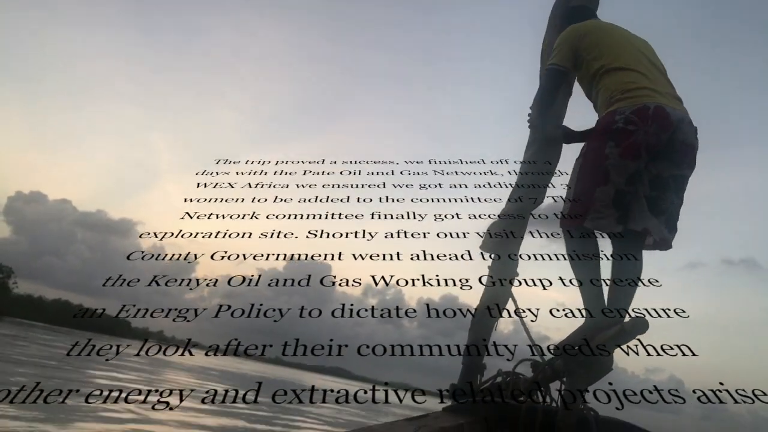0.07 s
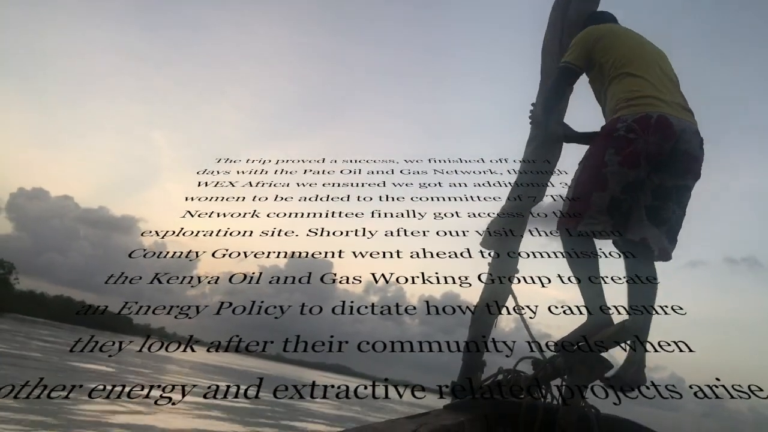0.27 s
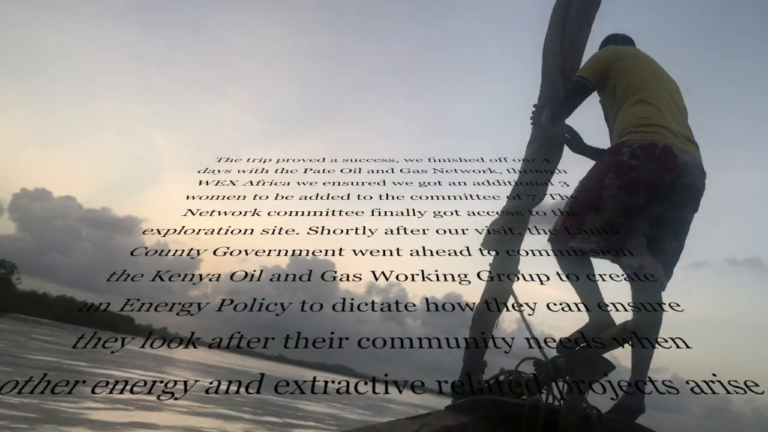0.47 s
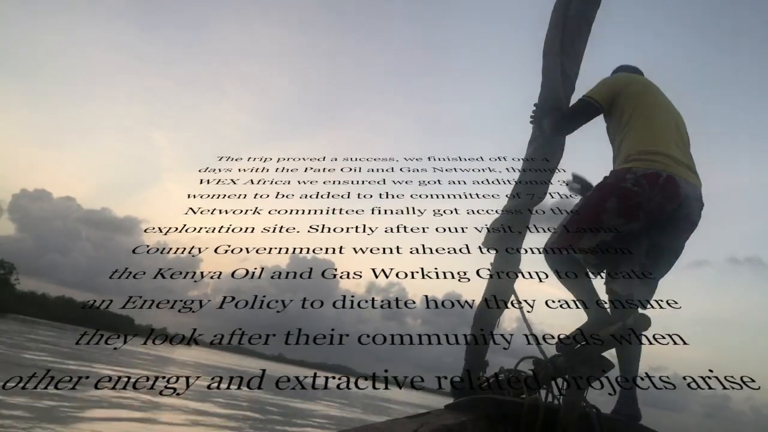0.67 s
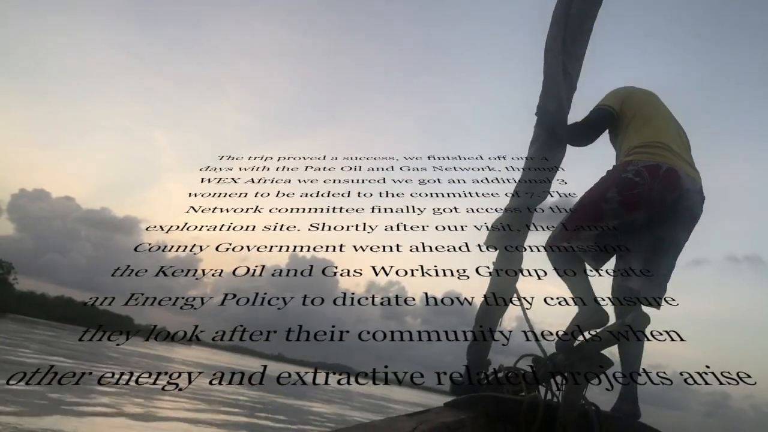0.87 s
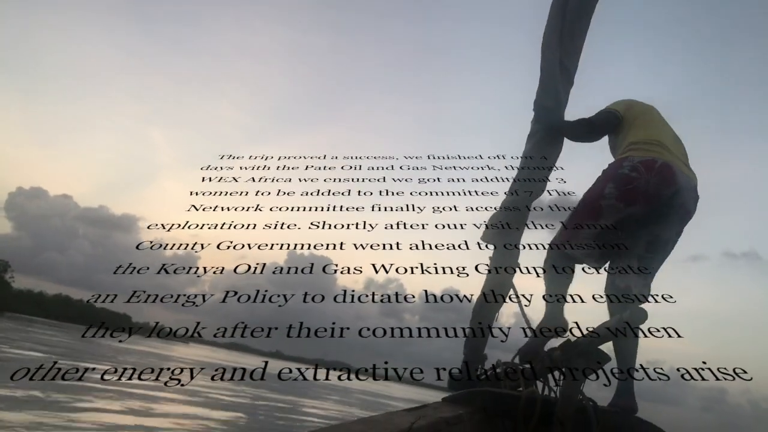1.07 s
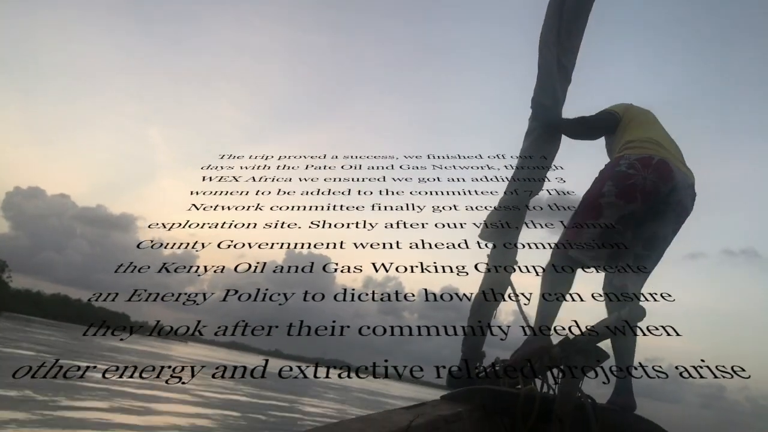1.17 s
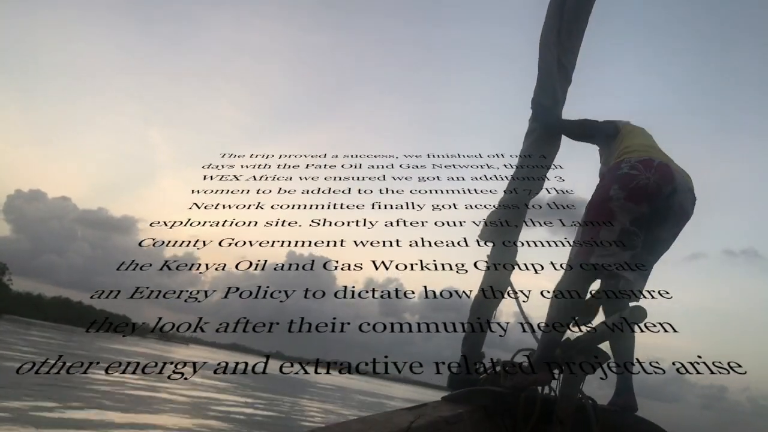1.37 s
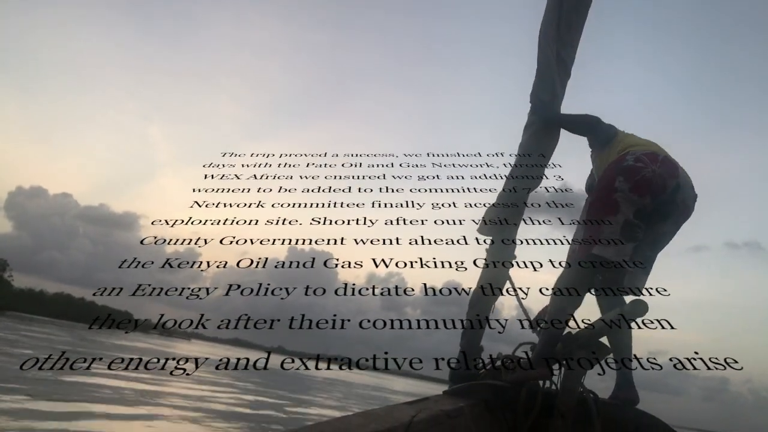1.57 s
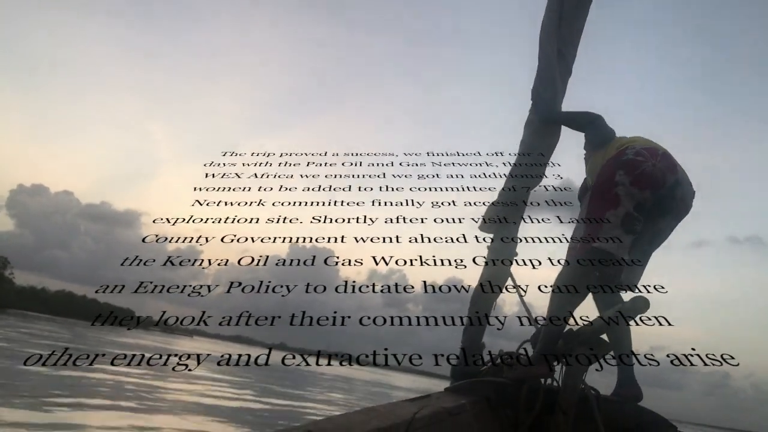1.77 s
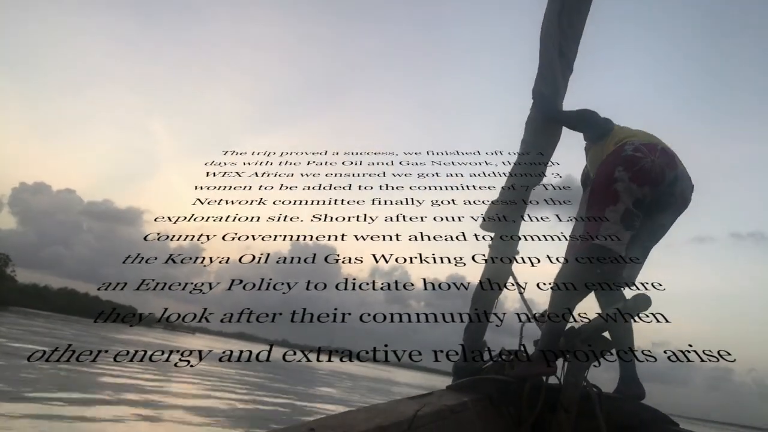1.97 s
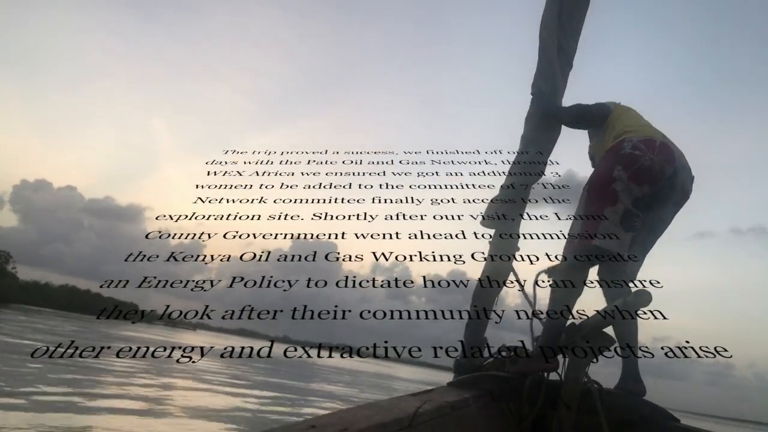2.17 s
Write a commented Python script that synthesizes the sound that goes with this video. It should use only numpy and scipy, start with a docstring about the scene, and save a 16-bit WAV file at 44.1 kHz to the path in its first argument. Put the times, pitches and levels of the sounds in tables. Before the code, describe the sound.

Feet thud on the planks of a wooden sailing boat. A short dry scuff opens, with a soft low bump near 0.24 s. Knocks and a dull double thud come at 0.41-0.52, a sharp hard tick at 0.59, then the loudest woody thump at 0.62, scuffing and bumping until 0.77. Faint scrapes fade by 1.05; soft thuds follow at 1.16 and 1.92 over steady low hull rumble, light wash and hiss.

```python
"""Feet land on the planks at the mast of a wooden sailing boat: smooth pushes ring the hull's modes as
thuds and knocks. Soles and rope scuff the wood in bunched short grains, and taps ring a small hard fitting.
Under it the hull rumbles in the water, with wash along the side and a smooth hiss, all shaped noise.
One microphone on board hears it all, short of the deepest bass and of two narrow treble bands."""
import sys
import numpy as np
from scipy import signal
from scipy.fft import rfft, irfft
from scipy.io import wavfile
from scipy.ndimage import uniform_filter1d

SR = 44100
rng = np.random.default_rng(int(sys.argv[2]) if len(sys.argv) > 2 else 0)


def log_audio(samples):
    """Write samples as a 16-bit WAV file to the path given in sys.argv[1]."""
    # one column per channel
    frames = np.atleast_2d(samples).T
    # limit to full scale, then quantise
    limited = np.clip(frames, -1, 1)
    pcm = np.round(limited * 32767).astype(np.int16)
    wavfile.write(sys.argv[1], SR, pcm)


def gain_from_db(level_db):
    """Turn a decibel level (scalar or array-like) into a linear amplitude factor."""
    decades = np.asarray(level_db, float) / 20
    return 10 ** decades


N = 97020  # samples, 2.2 s


def col(table, index):
    """One column of a table."""
    return np.array(table, float)[:, index]


def curve(table, index):
    """A column of a table drawn over time, straight between its rows."""
    return np.interp(np.arange(N) / SR, col(table, 0), col(table, index))


def coloured(spectrum):
    """Noise of rms 1 with the given spectrum, straight in dB over log frequency."""
    hz = np.maximum(np.arange(N // 2 + 1) * SR / N, 1)
    shape_db = np.interp(np.log(hz), np.log(col(spectrum, 0)), col(spectrum, 1))
    noise = irfft(rfft(rng.standard_normal(N)) * gain_from_db(shape_db), N)
    return noise / noise.std()


def walk(rate):
    """Random levels held 1 / rate s and slewed; spread near 1."""
    hold = int(SR / rate)
    steps = np.repeat(rng.standard_normal(N // hold + 1), hold)
    return uniform_filter1d(uniform_filter1d(steps, hold), hold)[:N]


def high_pass(sound, hz):
    """Second-order cut of everything below a frequency."""
    return signal.sosfilt(signal.butter(2, hz, "high", fs=SR, output="sos"), sound)


def split(sound, hz):
    """Low and high part of a sound, each at rms 1."""
    low = signal.sosfiltfilt(signal.butter(2, hz, fs=SR, output="sos"), sound)
    high = sound - low
    return low / low.std(), high / high.std()


def ring(force, modes, tilt_db=0):
    """A force drives a set of decaying modes; the tilt in dB per octave starts at the first mode."""
    out = 0
    for hz, db, t60 in modes:
        pole = np.exp(2j * np.pi * hz / SR - np.log(1000) / (t60 * SR))
        gain = gain_from_db(db + tilt_db * np.log2(hz / modes[0][0]))
        out = out + gain * signal.lfilter([1], [1, -pole], force).imag
    return out


def add(track, start_s, sound):
    """Mix a sound in at a time."""
    i = int(start_s * SR)
    track[i:i + len(sound)] += sound[:len(track) - i]


def water():
    """Hull rumble and wash are noise with drawn levels; the wash flickers slightly, the hiss stays smooth."""
    # Rumble of the hull in the water. Each row: frequency in Hz, relative level in dB per Hz.
    rumble_spectrum = [(11, -49), (18, -6.5), (56, -2.5), (91, -6.5), (184, -12.5), (296, -20.5),
                       (321, -27.5), (360, -18.5), (384, -20.5), (516, -43.5), (900, -43.5), (1170, -41),
                       (1980, -120)]
    # How hard the hull works. Each row: time in seconds, deep level in dB, planks level in dB.
    hull_work = [(0.0, -45, -44.5), (0.09, -46, -51.5), (0.23, -45, -48.5), (0.48, -50, -58),
                 (0.62, -46.5, -48.5), (0.75, -44, -47), (0.89, -45.5, -50.5), (1.14, -45, -54.5),
                 (1.33, -47, -52.5), (1.65, -47.5, -55.5), (1.98, -49, -52), (2.2, -44, -54.5)]
    # Wash along the side and hiss. Each row: frequency in Hz, relative level in dB per Hz.
    wash_spectrum = [(290, -15), (500, 1), (641, -4.5), (690, -6.5), (834, -9), (1070, -7.5), (1290, -6),
                     (1450, -10.5), (1710, -10), (1950, -10), (3700, -17), (7690, -20.5), (9030, -21.5),
                     (10300, -21.5), (15100, -21.5), (15700, -40), (16400, -54)]
    # Level of the wash. Each row: time in seconds, level in dB.
    wash_level = [(0.0, -55), (0.2, -62), (0.45, -60), (0.59, -60.5), (0.81, -59), (1.07, -61.5),
                  (1.68, -62.5), (2.2, -61.5)]
    rumble_split_hz, wash_top_hz, hiss_db = 107.5, 4670, -68
    planks_drift_db, wash_flicker_db = -0.06, 1  # the drift of the planks is too small to hear

    deep, planks = split(coloured(rumble_spectrum), rumble_split_hz)
    deep = deep * gain_from_db(curve(hull_work, 1))
    planks = planks * gain_from_db(curve(hull_work, 2) + planks_drift_db * walk(9.5))
    wash, hiss = split(coloured(wash_spectrum), wash_top_hz)
    wash = wash * gain_from_db(curve(wash_level, 1) + wash_flicker_db * walk(24.8))
    return deep + planks + wash + hiss * gain_from_db(hiss_db)


def scuffs():
    """Stick-slip on wood: dense short grains bunched in slips, sagging from first contact, then dying away."""
    # Soles and rope on the wood. Each row: start in seconds, length in seconds before it dies away,
    # rms level of the grain gains in dB, middle pitch in Hz, spread of pitch in octaves.
    scuff_table = [(.004, 0.015, -47.5, 1515, 0.29), (.022, 0.021, -48, 1660, 0.39),
                   (0.024, 0.014, -51, 3640, 0.2), (0.009, 0.0092, -55.5, 5900, 0.3),
                   (0.016, 0.036, -56, 8200, 0.6), (0.046, 0.0238, -64.5, 2030, 0.66),
                   (0.115, 0.034, -58, 2130, 0.82), (.142, 0.0076, -65, 2320, 0.61),
                   (0.168, .022, -56.5, 1340, 0.48), (.19, .012, -65, 3280, .3),
                   (0.239, .016, -57.5, 1420, 0.62), (0.236, .006, -64, 3500, 0.16),
                   (0.393, 0.018, -67, 4925, 0.26), (.411, .006, -48.5, 1410, 0.42),
                   (.4285, .002, -54.5, 12000, .12), (0.511, .012, -54.5, 1460, 0.58),
                   (0.592, 0.013, -49.5, 2100, 0.99), (.607, 0.019, -44.5, 1735, 0.65),
                   (.608, .004, -48, 5970, 0.71), (0.618, .005, -52.5, 7500, .4),
                   (.63, .04, -57, 1860, 0.77), (0.66, 0.0053, -54, 3600, .35),
                   (.675, .003, -43.5, 12270, 0.2), (0.679, 0.0056, -51, 10100, 0.4),
                   (0.676, .012, -49, 2030, 0.75), (0.72, 0.0074, -59, 1860, 0.46),
                   (0.73, .011, -55, 1740, 0.43), (0.733, .01, -59, 3740, 0.21),
                   (0.692, .03, -64, 1520, .8), (0.75, .01, -54, 1190, 0.54),
                   (.757, 0.0075, -55, 686, 0.093), (0.794, 0.084, -66.5, 2500, 0.82),
                   (0.899, .045, -64, 1970, 0.7), (0.891, 0.031, -70.5, 2540, 0.091),
                   (0.945, .004, -59, 3760, 0.14), (.96, 0.069, -61.5, 2980, 0.67),
                   (1.341, .014, -57, 7300, 0.22), (1.343, 0.0104, -62, 12020, 0.15),
                   (1.509, .005, -59, 1312, 0.065), (1.913, .01, -61, 515, 0.11)]
    grains_per_s, slips_per_s = 8000, 350
    scatter_db, slip_db, sag_db = 2.2, 2, 4
    tail_share, grain_cycles = .4, 1.89  # tail time constant as a share of the length

    out, t = np.zeros(N), np.arange(SR // 150) / SR
    for s, length, db, hz, width in scuff_table:
        span = length * (1 + 3 * tail_share)
        slips_db = slip_db * rng.standard_normal(128)
        when, size, sign_draw = rng.random((1600, 3))[:int(span * grains_per_s)].T
        when = when * span
        octaves = width * rng.standard_normal(1600)[:len(when)]
        grain_hz = np.clip(hz * 2 ** octaves, 200, .34 * SR)

        gain_db = -scatter_db * np.log(1 - size)
        gain_db = gain_db - sag_db * np.minimum(when / length, 1)
        gain_db = gain_db - np.abs(octaves)  # 1 dB weaker per octave off the middle pitch
        gain_db = gain_db + slips_db[(when * slips_per_s).astype(int)]
        tail = np.exp(-np.maximum(when - length, 0) / (tail_share * length))
        gain = gain_from_db(gain_db) * tail * np.sign(sign_draw - .5)
        gain = gain * gain_from_db(db) / np.sqrt(np.mean(gain ** 2))

        turns = np.outer(grain_hz, t)
        # a narrow spread of pitch needs longer grains
        fade = turns / (grain_cycles * max(1, 0.33 / max(width, .05)))
        grains = gain[:, None] * np.sin(2 * np.pi * turns) * 2 * fade * np.exp(-2 * fade)
        where = ((s + when) * SR).astype(int)[:, None] + np.arange(len(t))
        out += np.bincount(where.ravel(), grains.ravel(), N)[:N]
    return out


def blows():
    """Each blow is a smooth push that rings the hull: long contacts thud, short ones knock."""
    # Modes of the hull. Each row: frequency in Hz, relative level in dB, t60 in seconds.
    hull_modes = [(42.5, -3.5, 0.19), (59.6, 5.5, 0.063), (93, -3, 0.065), (133, -11.5, 0.092),
                  (190.5, -12.5, 0.065), (245, -17, .07), (287, -20.5, 0.086), (333.5, -12.5, .1),
                  (410.5, -15.5, 0.091), (500, -16, 0.055), (558, -17.5, 0.13), (662, -29.5, 0.056),
                  (1120, -17, 0.041), (1410, -20, 0.053), (1950, -30.5, 0.038)]
    # Blows on the hull. Each row: start in seconds, peak level in dB, approximate contact in ms.
    blow_table = [(.172, -46.5, 0.73), (0.237, -29, 13.4), (0.4128, -34.5, 0.55), (0.418, -41, 0.37),
                  (.423, -30.5, 1.5), (.428, -30.5, 0.58), (0.442, -24.5, 4.1), (0.432, -31, 3.7),
                  (0.454, -24.5, 3.4), (0.481, -31.5, 7.4), (0.51, -48, 0.57), (0.513, -29, 2.7),
                  (0.608, -28.5, 1.03), (.614, -24, 1.48), (.621, -20, 1.85), (0.622, -15, 4.2),
                  (.633, -39.5, 1.75), (0.641, -19.5, 6.3), (0.6448, -31.5, 1.86), (0.674, -28, 2.7),
                  (0.718, -26.5, 11.2), (.741, -27.5, 9.4), (.758, -37, 0.97), (1.159, -31, 7.9),
                  (1.918, -36.5, 2.2)]
    knock_hz_ms = 360  # a short contact moves only a patch of plank: lowest pitch x contact time

    out = np.zeros(N)
    for s, db, contact_ms in blow_table:
        push = np.hanning(int(contact_ms * SR / 1000) + 3)
        sound = ring(np.pad(push, (0, SR // 4)), hull_modes)
        if contact_ms < 2:
            sound = high_pass(sound, knock_hz_ms / contact_ms)
        add(out, s, sound * gain_from_db(db) / np.abs(sound).max())
    return out


def ticks():
    """A sharp tap rings the modes of a small hard fitting for a few milliseconds."""
    # Modes of the fitting. Each row: frequency in Hz, relative level in dB before the tick's tilt,
    # t60 in seconds.
    fitting_modes = [(2260, 6.5, 0.013), (3330, -10, 0.012), (5210, -2, 0.015), (6070, 7.5, 0.0047),
                     (8450, 7.5, 0.0018), (12000, -5, 0.0031), (14000, -14, .003)]
    # Ticks of the fitting. Each row: start in seconds, peak level in dB, brightness in dB per octave.
    tick_table = [(.4293, -45, -3), (0.5868, -23.5, -0.5), (.945, -45.5, 7.5), (.995, -45, 26),
                  (1.1165, -48, 28)]

    out, tap = np.zeros(N), np.pad(np.hanning(5), (0, SR // 40))
    for s, db, tilt_db in tick_table:
        sound = high_pass(ring(tap, fitting_modes, tilt_db), 1400)
        add(out, s, sound * gain_from_db(db) / np.abs(sound).max())
    return out


def scene():
    """Everything on board at one microphone."""
    return (water() + scuffs() + blows() + ticks())[None]


def top_cut(x):
    """Nothing passes above the cut-off."""
    return signal.sosfilt(signal.butter(12, 16580, fs=SR, output="sos"), x)


def record(dry):
    """The microphone loses the deepest bass, and its housing takes out two narrow bands."""
    # Dips of the microphone housing. Each row: frequency in Hz, width in Hz, share removed (0 to 1).
    housing_dips = [(7550, 240, 0.56), (10380, 340, 1)]
    mix = high_pass(dry, 22)
    for hz, width_hz, share in housing_dips:
        mix = mix - share * signal.lfilter(*signal.iirpeak(hz, hz / width_hz, fs=SR), mix)
    return top_cut(mix)


dry = scene()
out = record(dry)
log_audio(out)
```